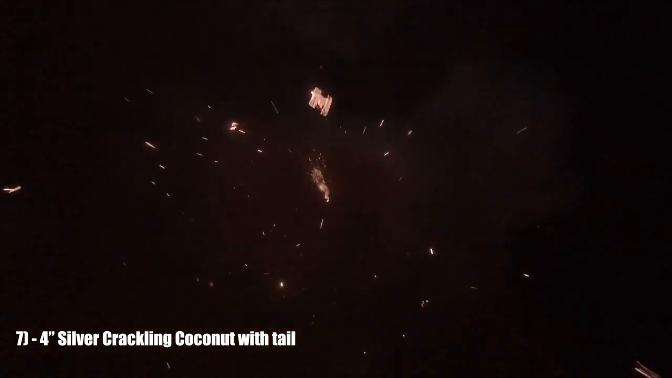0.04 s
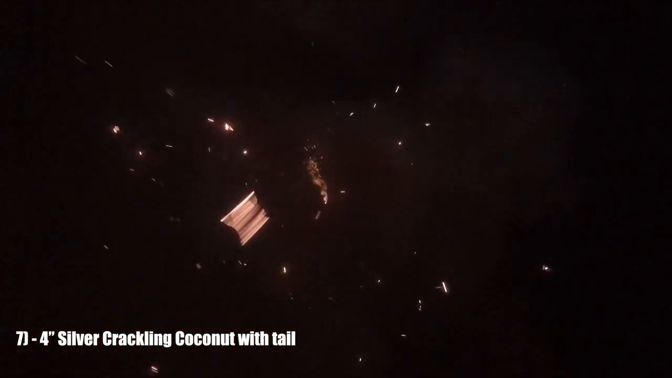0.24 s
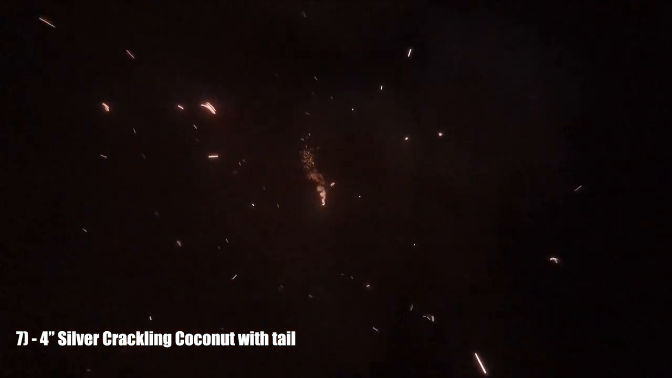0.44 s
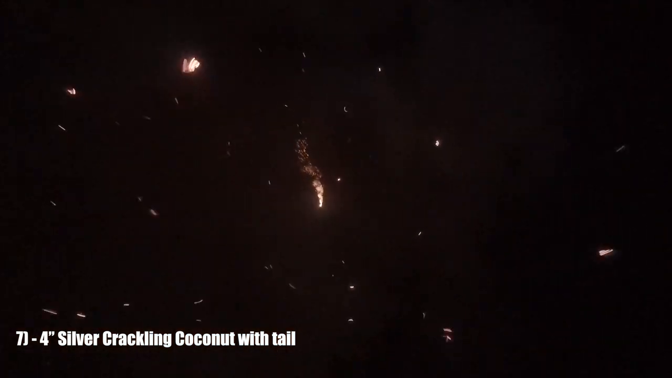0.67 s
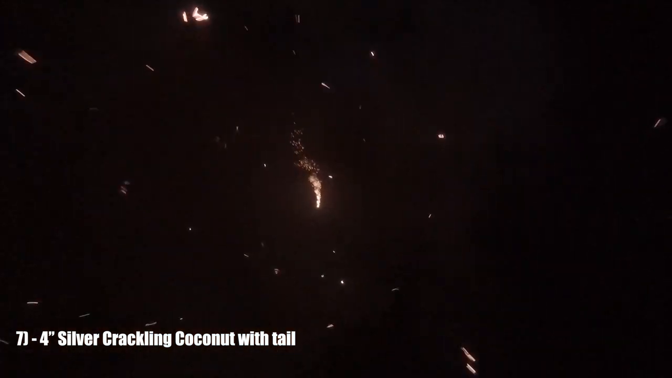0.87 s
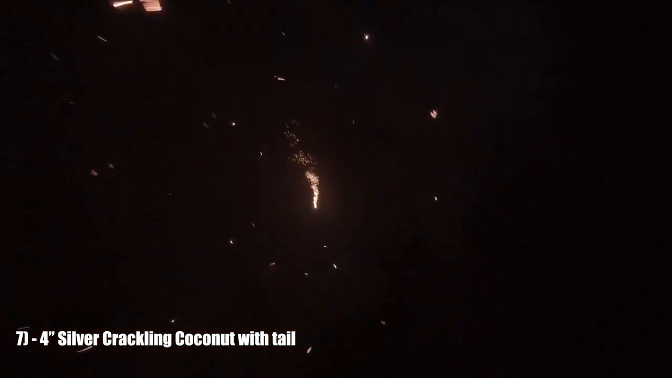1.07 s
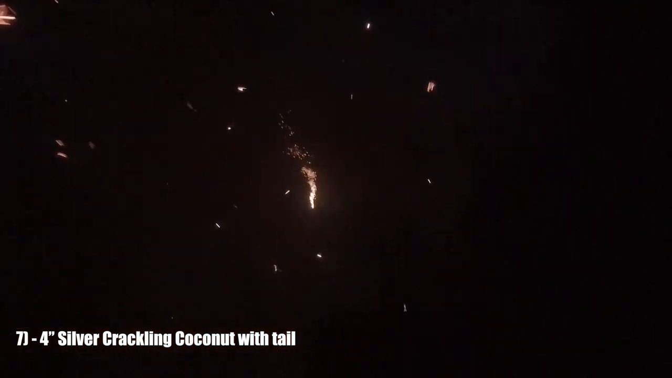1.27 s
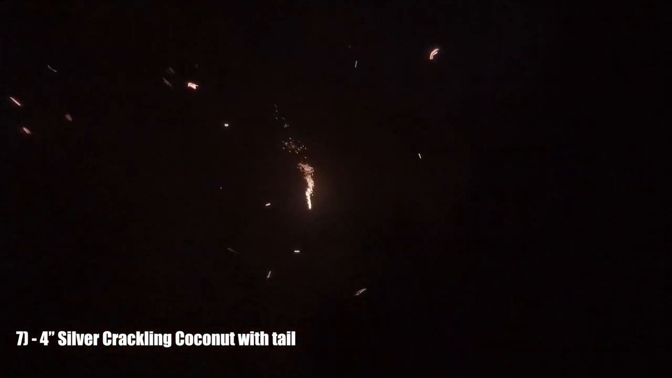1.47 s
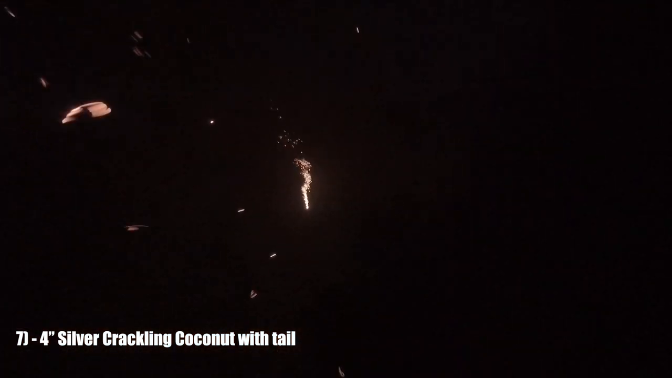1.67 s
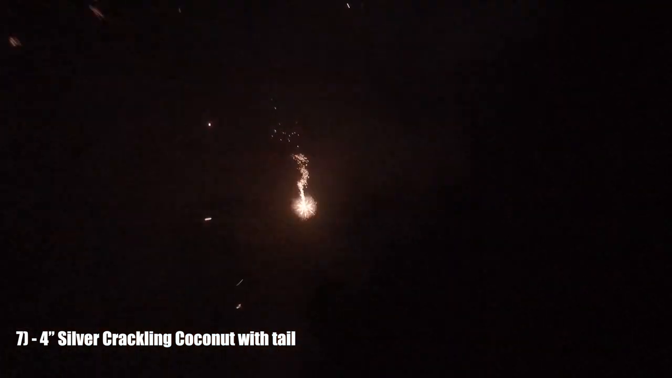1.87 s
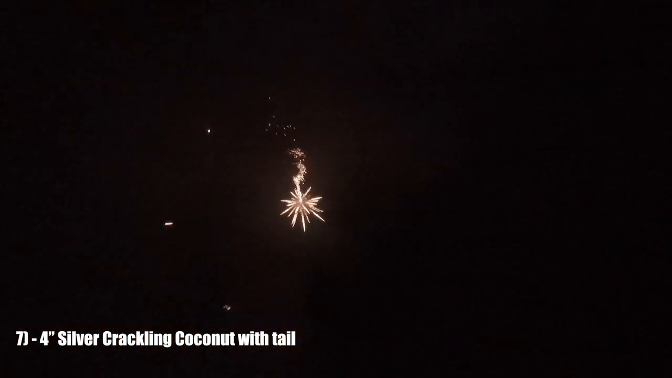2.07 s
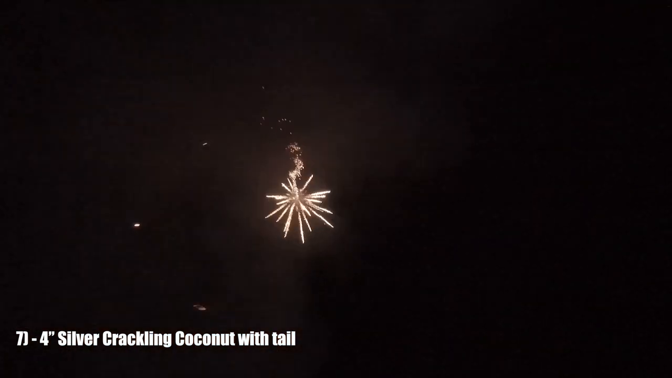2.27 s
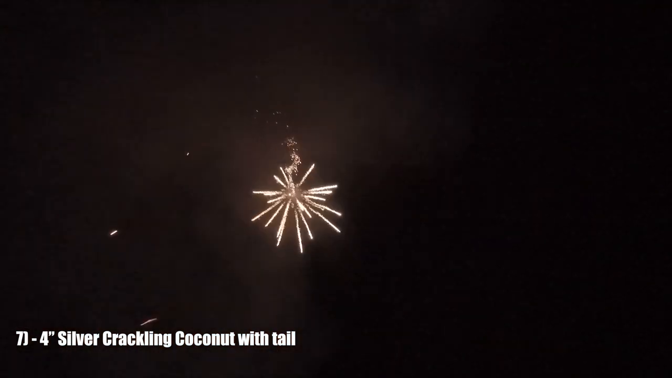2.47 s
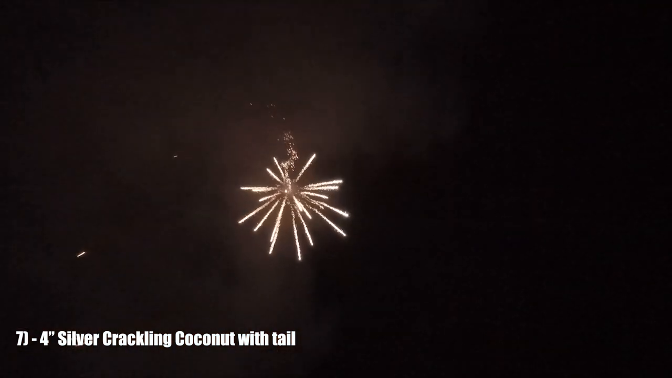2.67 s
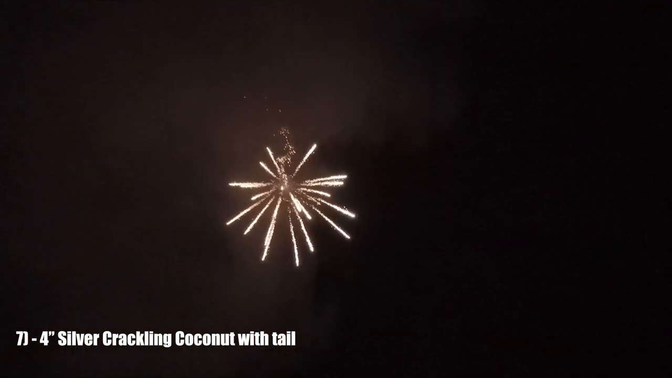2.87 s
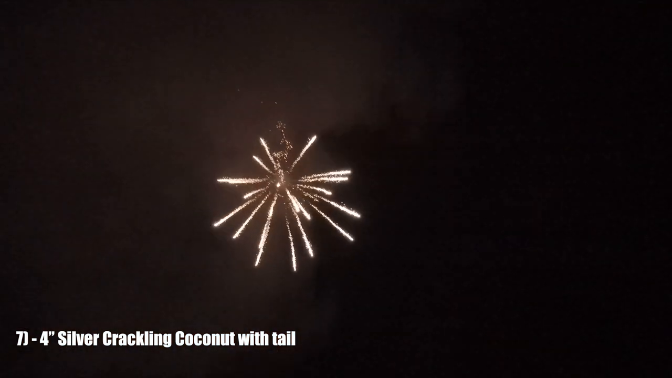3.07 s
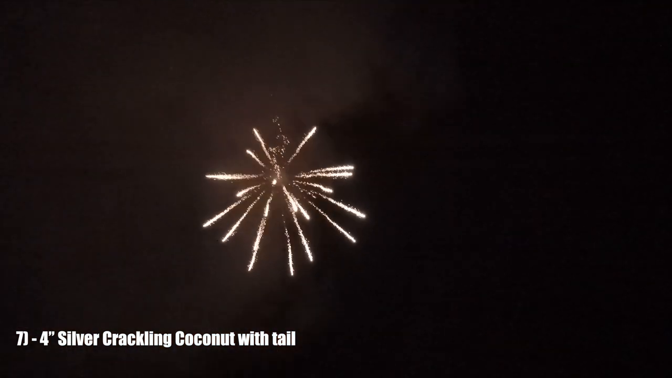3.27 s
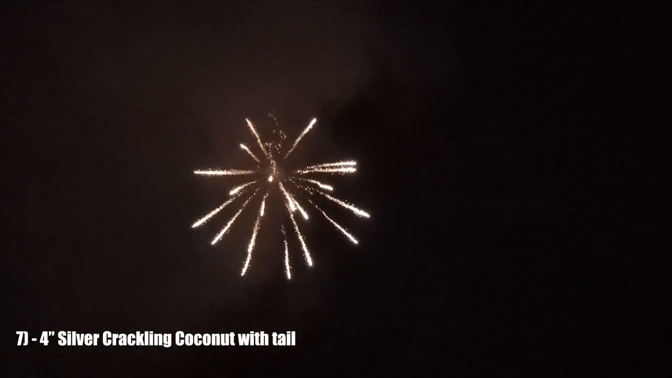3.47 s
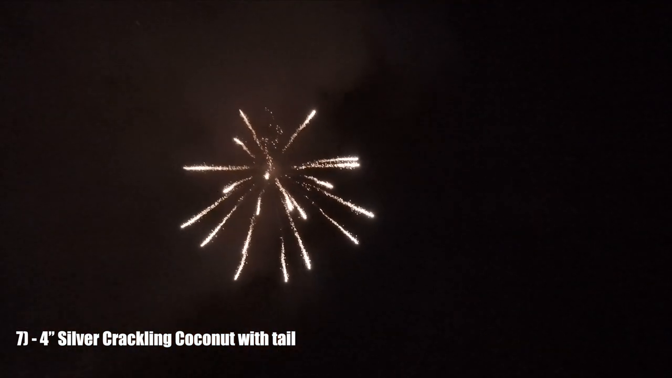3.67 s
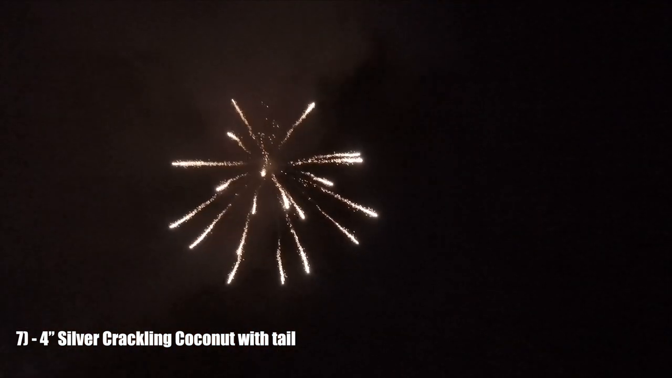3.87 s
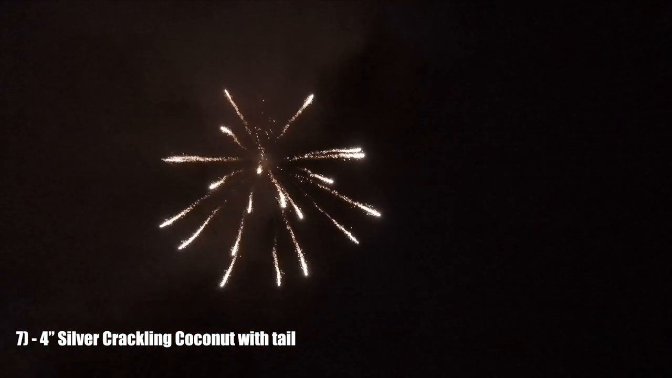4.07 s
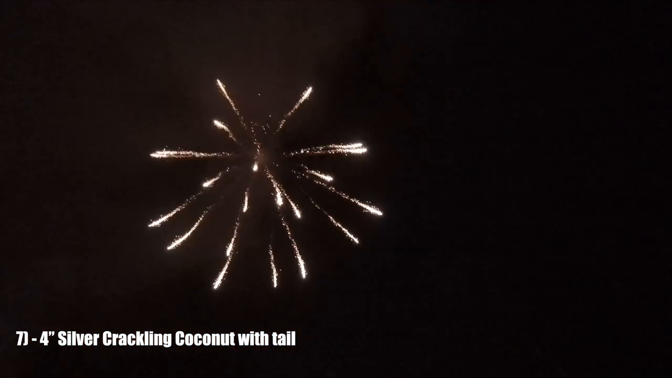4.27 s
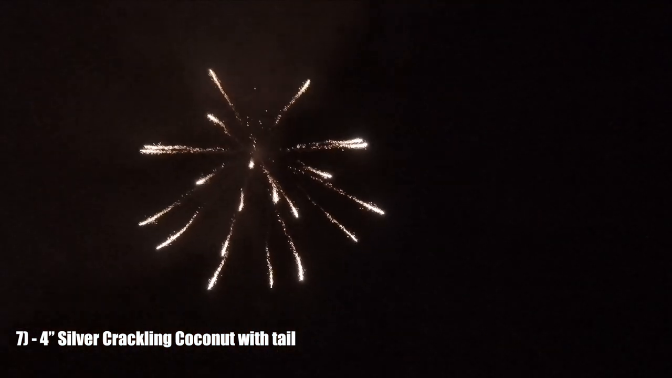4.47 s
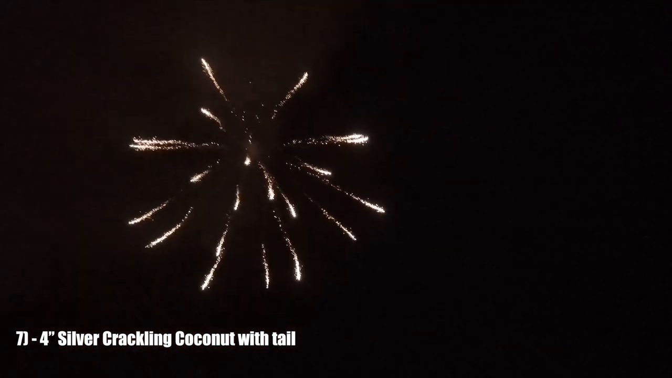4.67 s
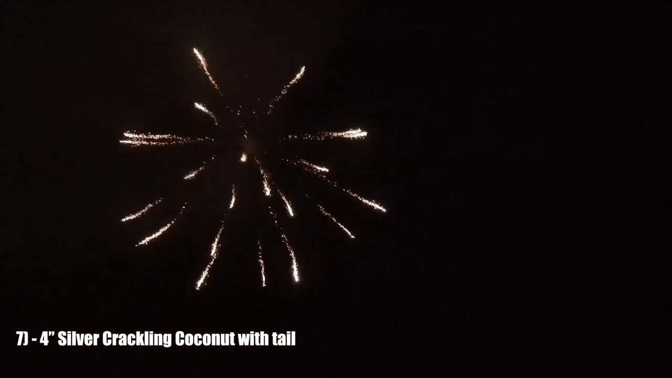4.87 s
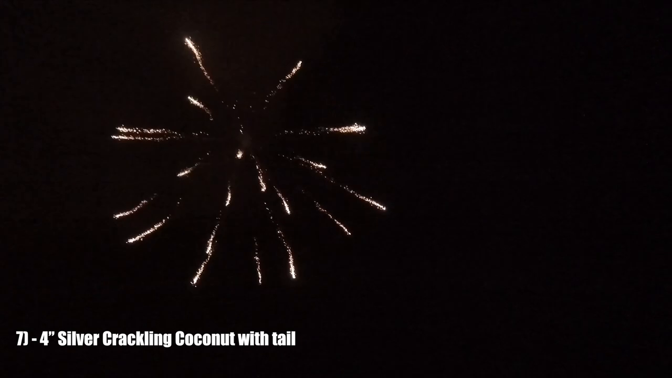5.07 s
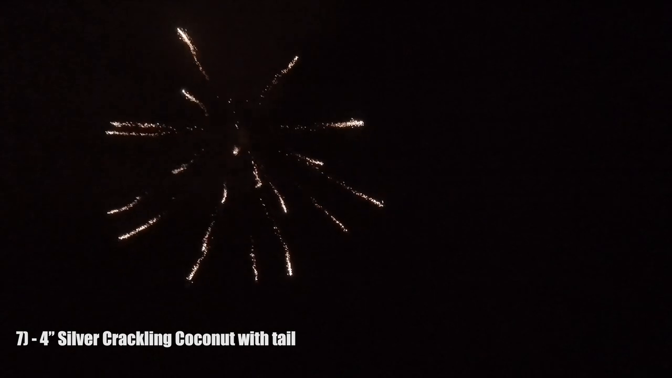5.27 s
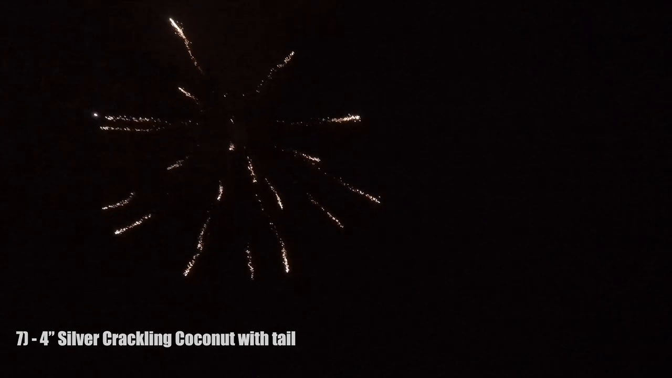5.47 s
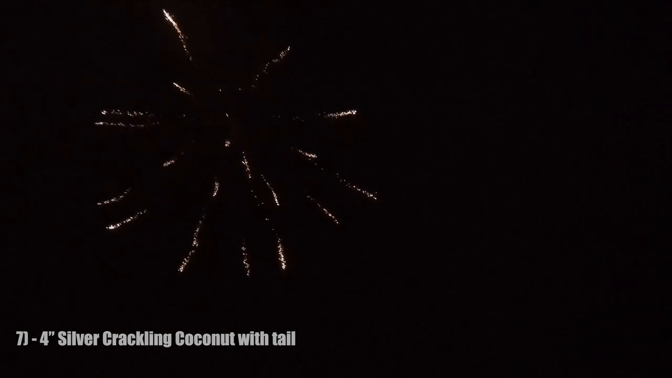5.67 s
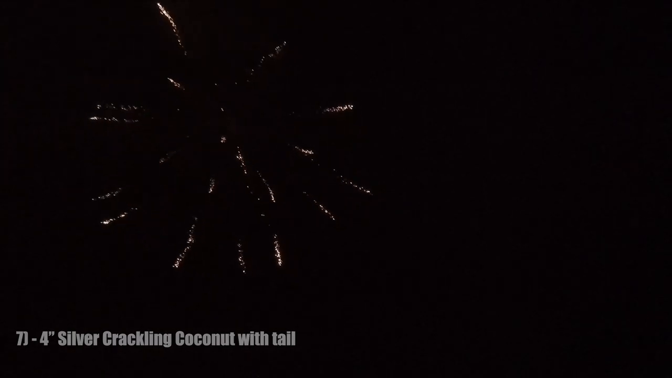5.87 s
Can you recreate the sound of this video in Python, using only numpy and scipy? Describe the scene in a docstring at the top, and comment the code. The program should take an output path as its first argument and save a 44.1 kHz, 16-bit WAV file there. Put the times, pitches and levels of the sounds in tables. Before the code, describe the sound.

A firework shell climbs with tiny sizzling ticks, bursts in a single huge bang, rumbles back, and crackles thickly before dying out.

```python
"""A firework shell bursts with one bang, which rolls back from the land near and far: shaped pulses and noise.
Its stars crackle as showers of short pulses, over a thousand a second at first, thinning and dulling.
Before the bang the climbing tail spits ringing ticks and sizzles, and a few tones swell into the burst.
Behind lie a low drone that surges twice and, as filtered noise, wind on the microphone, rumble and hiss.
The bang overloads the microphone, and the gain drops before it creeps back."""
import sys
import numpy as np
from scipy import signal
from scipy.fft import rfft, irfft, next_fast_len
from scipy.io import wavfile
from scipy.ndimage import uniform_filter1d, map_coordinates

SR = 44100
rng = np.random.default_rng(int(sys.argv[2]) if len(sys.argv) > 2 else 0)


def wrap_up_sound(samples):
    """Save the sound to the file named by the first command line argument, as 16-bit audio."""
    columns = np.atleast_2d(samples).T
    # keep every value between -1 and 1, then stretch to whole-number steps
    tamed = np.clip(columns, -1, 1)
    steps = np.round(tamed * 32767).astype(np.int16)
    wavfile.write(sys.argv[1], SR, steps)


N = 261072
TIME = np.arange(N) / SR
BURST_S = 2.2148  # the bang reaches the microphone


def amp(db):
    """Decibels to gain."""
    return 10 ** (np.asarray(db) / 20)


def unit(x):
    """x at rms 1."""
    return x / np.sqrt(np.mean(x ** 2) + 1e-20)


def peaked(x):
    """x at peak 1."""
    return x / (np.abs(x).max() + 1e-20)


def along(points, hz):
    """(Hz, value) points read on a log frequency axis."""
    f, v = np.transpose(points)
    return np.interp(np.log(hz + 1), np.log(f + 1), v)


def ramp(start, end):
    """A fade from 0 to 1 between two times in seconds."""
    return np.clip((TIME - start) / max(end - start, 1e-4), 0, 1)


def arch(db, full_s, rise_db_per_s, fall_s=0, fall_db_per_s=0):
    """A level in dB that climbs to its top, holds and may fall again."""
    climb_db = rise_db_per_s * np.maximum(full_s - TIME, 0)
    fall_db = fall_db_per_s * np.maximum(TIME - fall_s, 0)
    return db - climb_db - fall_db


def wobble(rate):
    """A smooth random curve, rate knots a second."""
    knots = rng.standard_normal(int(N * rate / SR) + 4)
    return map_coordinates(knots, [TIME * rate])


def filtered(x, response):
    """x times a response of frequency."""
    m = next_fast_len(N + SR // 2)
    return irfft(rfft(x, m) * response(np.fft.rfftfreq(m, 1 / SR)), m)[:N]


def noise(spectrum):
    """Coloured noise of rms 1."""
    return unit(filtered(rng.standard_normal(N), lambda hz: amp(along(spectrum, hz))))


def pulse(spectrum, size=4096):
    """The most abrupt pressure pulse that has this spectrum (minimum phase), energy 1."""
    gain = amp(along(spectrum, np.fft.rfftfreq(size, 1 / SR)))
    cepstrum = irfft(np.log(np.maximum(gain, 1e-6)))
    # folding the cepstrum forward packs the energy at the start
    cepstrum[1:size // 2] *= 2
    cepstrum[size // 2 + 1:] = 0
    shape = irfft(np.exp(rfft(cepstrum)))
    return shape / np.linalg.norm(shape)


def split(x, hz):
    """The parts of x below and above a frequency."""
    parts = []
    for kind in ("low", "high"):
        sos = signal.butter(3, min(hz, SR / 3), kind, fs=SR, output="sos")
        parts.append(signal.sosfilt(sos, x))
    return parts


def add(track, s, sound):
    """Mix a sound into a track at a time in seconds."""
    part = track[max(round(s * SR), 0):][:len(sound)]
    part += sound[:len(part)]


def shower(rate, spread_db, limit=1.3):
    """Impulses at random times and of uneven size, power about 1."""
    hit = rng.random(N) < rate / SR
    sizes = hit * amp(spread_db * np.minimum(rng.standard_normal(N), limit))
    power = np.abs(uniform_filter1d(sizes ** 2, size=8192))
    return sizes / np.sqrt(power + 1e-6)


def field(x):
    """Ground and trees scatter a sound into a short tail; the bass dies first, the middle lasts longest."""
    # Reverberation of the open ground: (frequency [Hz], time to fall by 60 dB [s])
    decay_times = [(200, 0.15), (1500, 1), (8000, 0.49)]
    hz, t, z = signal.stft(rng.standard_normal(SR // 2), SR, nperseg=256)
    fading = amp(-60 * t / along(decay_times, hz)[:, None])
    tail = signal.istft(z * fading, SR, nperseg=256)[1]
    return signal.fftconvolve(x, tail / np.linalg.norm(tail))[:N]


def blast(ground_s=0.00297):
    """The shock front jumps in one pulse; its bounce off the ground follows, duller, with a suction after it."""
    # Shock front: (frequency [Hz], relative level [dB])
    front_spectrum = [(100, -14), (400, 3), (750, 12), (1100, 1), (2000, -18.5), (4000, -53), (9000, -32.5),
                      (12500, -35), (16000, -52)]
    # Bounce off the ground: (frequency [Hz], relative level [dB])
    bounce_spectrum = [(30, -11), (120, -0.5), (250, -6.5), (450, -10), (800, -9.5), (1500, -38),
                       (3000, -49), (8000, -58), (15000, -82.5)]
    crack = peaked(split(pulse(front_spectrum), 13000)[0])
    push = peaked(pulse(bounce_spectrum))
    suction = -peaked(split(push, 400)[0])
    bang = np.zeros(N)
    add(bang, BURST_S, amp(2.5) * crack)
    add(bang, BURST_S + ground_s, amp(3.5) * push)
    add(bang, BURST_S + ground_s + 0.00071, amp(-12.5) * suction)
    return bang


def echoes():
    """The bang returns as decaying noise, ever deeper, with one faint slap and a bright wash off the trees."""
    # Early roll off the land nearby: (frequency [Hz], relative level [dB])
    near_roll = [(30, -40), (60, -17), (110, 1), (160, -1.5), (270, -1), (370, -29), (600, -24),
                 (1200, -52), (3000, -120)]
    # Later, deeper roll: (frequency [Hz], relative level [dB])
    far_roll = [(20, -23), (35, -3), (65, 3.5), (110, -2.5), (200, -3), (330, -12.5), (700, -18),
                (1200, -46), (3000, -120)]
    # Bright wash off the trees: (frequency [Hz], relative level [dB])
    wash_spectrum = [(180, -15), (350, 1.5), (700, -3.5), (1400, -2), (2800, -8), (4000, -14.5),
                     (6500, -19), (9500, -50), (11500, -51), (14000, -58), (16000, -85)]
    # Top of the wash, early and quick to die: (frequency [Hz], relative level [dB])
    glint_spectrum = [(2000, -25), (4000, 3), (7000, 0.5), (9500, -6), (11000, -20), (14000, -28),
                      (16000, -45)]
    wash_peak_s, glint_peak_s, slap_s = 2.408, 2.38, 2.277

    since = np.maximum(TIME - BURST_S, 0)
    nearby = amp(-13.5 - 24.5 * since)  # dB, then dB per second
    distant = amp(-26 - 11 * since)
    depth = ramp(2.28, 2.406)
    roll = np.sqrt(1 - depth) * noise(near_roll) + np.sqrt(depth) * noise(far_roll)
    roll *= np.hypot(nearby, distant)

    wash_db = arch(-24.5, wash_peak_s, 57, wash_peak_s, 31.5)
    glint_db = arch(-39, glint_peak_s, 23, glint_peak_s, 65)
    wash = amp(wash_db) * noise(wash_spectrum) + amp(glint_db) * noise(glint_spectrum)

    slap = np.zeros(N)
    knock = peaked(pulse([(100, -12), (300, -3), (520, 12), (750, -13), (1500, -23), (5000, -70)]))
    add(slap, slap_s, amp(-11.0) * knock)
    add(slap, slap_s + 0.0054, -amp(-19.0) * knock)  # the slap bounces off the ground too
    arrived = ramp(BURST_S + .007, BURST_S + .02)
    return (roll + wash) * arrived + slap


def dying(half_s, spread_s):
    """The share of the stars that still burn: half at half_s, falling along a smooth S."""
    return 1 / (1 + np.exp((TIME - half_s) / spread_s))


def crackle():
    """Each grain of the stars bursts as one short pulse; the pops thin out and dull as the stars burn out."""
    # Pops of the young stars: (frequency [Hz], relative level [dB])
    fresh_spectrum = [(120, -21), (300, -10), (520, -1), (720, 4.5), (950, 3), (1200, -2.5), (1700, -0.5),
                      (2500, -8), (3200, -14.5), (4500, -20.5), (6000, -20.5), (7500, -28), (10000, -44.5),
                      (14000, -74)]
    # Pops of the dying stars: (frequency [Hz], relative level [dB])
    spent_spectrum = [(60, -48), (150, -21), (350, -8.5), (600, 2.5), (950, 0), (1500, -8), (2400, -16.5),
                      (3300, -13), (5200, -12.5), (6200, -21.5), (7000, -32), (10000, -45), (16000, -68)]
    # Loudest pops, before the trims below: (time [s], reference level [dB], snap relative to it [dB])
    loud_pops = [(2.7041, -9.5, -7.5), (2.8559, -16.5, -19.0), (3.0979, -17, -7), (3.1503, -17.0, -6),
                 (3.2698, -15.5, -5.5), (3.3267, -18.5, -8), (3.5894, -25, 0), (3.6434, -21.5, 2.5),
                 (3.6719, -18.5, -2.5), (3.7895, -19, -8), (3.8093, -13.5, -21), (3.922, -17, -3.5),
                 (3.9406, -24, -3), (3.9995, -16, -17), (4.0348, -16, -18), (4.0809, -14, -16),
                 (4.1202, -14.5, -15), (4.2021, -16, -25.5), (4.386, -15.5, -19), (4.4108, -14.5, -12),
                 (4.5188, -18.5, -7), (4.7628, -21, -9.0), (4.8288, -18.0, -11.5), (4.8741, -20, -25),
                 (4.9444, -18, -13), (4.9592, -14, -18), (5.0498, -18.5, -8.5), (5.1137, -34, 2),
                 (5.1679, -15.5, -14), (5.192, -18.5, -12), (5.2423, -23.5, -13), (5.2571, -21, -16),
                 (5.2848, -31, -6.5), (5.2972, -19.5, -10), (5.323, -24, -14), (5.331, -24, -6),
                 (5.402, -24.5, -9), (5.4359, -25, -7.5), (5.463, -26, -4), (5.5244, -21, -8),
                 (5.5374, -22.5, -11), (5.5525, -25, -11), (5.5885, -23, -9), (5.6135, -35, -11),
                 (5.6335, -28, -14.0), (5.667, -22.5, -15), (5.7275, -31, -25), (5.7802, -27, -8),
                 (5.8651, -32, -1)]
    pops_per_s, stray_pops_per_s = 1150, 40  # with all stars alight; throughout the crackle
    body_db, young_snap_db, old_snap_db = -34, -42, -51  # bass part; treble of young and of dying stars
    dull_start_db, sharp_from_s = -2.5, 3.55  # the first pops lack treble

    alight = dying(4.986, 0.28)
    age = ramp(4.37, 4.77)
    grains = shower(pops_per_s * alight + stray_pops_per_s, spread_db=4.0, limit=1.74)
    grains = grains * ramp(2.4, 2.8)  # the stars ignite
    grains = grains * amp(0.72 * wobble(21.98))  # the pops come in clumps
    body = grains * amp(body_db) * np.sqrt(alight)

    snap_db = young_snap_db * (1 - age) + old_snap_db * age
    snap_db += dull_start_db * (1 - ramp(sharp_from_s - .05, sharp_from_s + 0.036))
    uneven_db = 2 * np.clip(rng.standard_normal(N), -2, 1.5)  # some pops are sharper than others
    # the snaps die out later than the body, and more suddenly
    snap = grains * amp(snap_db + uneven_db) * np.sqrt(dying(5.41, 0.071))

    young = split(pulse(fresh_spectrum), 2900)
    old = split(pulse(spent_spectrum), 2900)
    pops = np.zeros(N)
    for share, shapes in ((1 - age, young), (age, old)):
        for train, shape in zip((body, snap), shapes):
            pops -= signal.fftconvolve(share * train, shape / np.linalg.norm(shape))[:N]

    widths_s = rng.uniform(0.00037, 0.00092, len(loud_pops))
    for (s, db, sharp_db), width_s in zip(loud_pops, widths_s):
        thud, click = young if s < 4.6 else old
        thud, click = peaked(thud), peaked(click)
        pop = amp(db - 3) * thud + amp(db + sharp_db + 2.5) * click
        # a loud pop is an N-wave: push, suction, push
        add(pops, s - 0.65 * width_s, amp(db - 13) * thud)
        add(pops, s, -pop)
        add(pops, s + width_s, amp(db - 32) * thud)
        add(pops, s + rng.uniform(.0007, 0.00256), -amp(-7) * pop)  # its bounce off the ground
    return pops + amp(-9.0) * field(pops)


def tail_sparks():
    """The climbing tail spits sharp ticks, each with a pitch of its own, over a fine sizzle of pulses."""
    # Loudest sparks, before the trims below:
    # (time [s], peak level [dB], ring [Hz], top treble level [dB], body level [dB])
    loud_sparks = [(0.2788, -57, 4730, -19, 2), (0.351, -57, 5410, -24, -6), (1.2165, -29, 6050, -23, -3),
                   (1.424, -32.5, 3900, -17, 5), (1.5732, -31, 4560, -8, 4), (1.749, -37, 4980, -10, -17),
                   (1.8153, -25, 6000, -7.5, -2.5), (1.9006, -37, 5900, -23, -9),
                   (1.919, -35, 4800, -26, -32), (2.0934, -33, 6500, -13, -18), (2.1754, -37, 6330, -10, 5)]
    ticks, t = np.zeros(N), TIME[:600]
    for s, db, hz, top_db, body_db in loud_sparks:
        bass = [(300, body_db + 12.5), (1600, body_db)]
        ring = [(1.02 * hz, -7), (hz, 2)]
        treble = [(max(1.4 * hz, 10000), top_db - 2), (16000, top_db + 1.5)]
        tick = pulse(bass + ring + treble)
        spit = 0.15 * rng.standard_normal(len(t)) * np.exp(-t / 0.0017)
        spit[0] = 1
        add(ticks, s, amp(db + 2) * peaked(signal.fftconvolve(tick, spit)))

    burning = amp(-102 + 31.5 * ramp(0.16, 1.93)) * (TIME < BURST_S)
    for hz in (2830, 4070, 5600, 7500):
        fizz = pulse([(.2 * hz, -25), (0.56 * hz, -9), (hz, 0), (1.8 * hz, -12), (16000, -22)])
        ticks += signal.fftconvolve(shower(50, spread_db=7), fizz)[:N] * burning
    return ticks + amp(-32.0) * field(ticks)


def swell(rise_s=0.012, bend=1.43):
    """Low tones, thin fluttering high ones and grit swell for hundredths of a second, to break off at the bang."""
    # Tones before the bang, ahead of the common gain below: (frequency [Hz], level [dB])
    swell_tones = [(140.0, -12), (419.9, -22.5), (915, -33), (1357, -39), (1460, -34.5), (1739, -45),
                   (2110, -38), (2293, -38), (2767, -34), (3612, -63), (3989, -54), (5012, -63),
                   (5394, -56), (6325, -38), (7456, -43), (8484, -69), (9981, -54)]
    near = np.abs(TIME - BURST_S) < .06
    t = TIME[near] - BURST_S
    tones = np.zeros(N)
    for hz, db in swell_tones:
        flutter_db = 6.3 * (hz > 1000) * np.sin(2 * np.pi * (90 * t + rng.random()))
        tones[near] -= amp(db + flutter_db) * np.sin(2 * np.pi * hz * t)
    grit = amp(-22.0) * noise([(300, -7), (850, 10.5), (1200, -10), (2800, -4), (4000, -20.0),
                               (7000, -15), (12000, -38), (15000, -48), (16000, -68)])
    lead = np.maximum(BURST_S - .006 - TIME, 0)
    rise = np.exp(-(lead / rise_s) ** bend)
    cut = 1 - ramp(BURST_S - .001, BURST_S + 0.0043)
    return (amp(8.5) * tones + grit) * rise * cut


def drone():
    """Low noise in a narrow band, uneven in level, sets in under the crackle and surges twice."""
    # Colour of the drone: (frequency [Hz], relative level [dB])
    drone_spectrum = [(50, -70), (105, -34), (138, -4), (172, 0), (220, -3), (310, -9.5), (500, -37),
                      (900, -53), (2000, -120)]
    # Surges of the drone: (time [s], added level [dB])
    surges = [(3.6, 3), (5.8, 6)]
    surge_width_s = 0.078
    surge_db = sum(db * np.exp(-.5 * ((TIME - s) / surge_width_s) ** 2) for s, db in surges)
    level = amp(-40.5 + surge_db + 0.65 * wobble(12))
    return level * noise(drone_spectrum) * ramp(3.04, 3.52)


def air():
    """Noise for wind on the microphone, a far rumble and a thin hiss fades in over a steady rush; wind drops."""
    # Wind on the microphone: (frequency [Hz], relative level [dB])
    wind_spectrum = [(8, -22), (20, 12), (32, 11), (55, 3.5), (80, -2.5), (130, 0.5), (250, -32),
                     (600, -120)]
    # Far rumble: (frequency [Hz], relative level [dB])
    rumble_spectrum = [(110, -7), (170, -4.5), (270, 3), (400, -1.5), (550, -4), (750, -6.5), (1100, -18),
                       (1600, -26), (2300, -30), (3000, -36.5), (5000, -55), (9000, -120)]
    # Faint steady rush: (frequency [Hz], relative level [dB])
    rush_spectrum = [(300, -29), (900, -1), (1400, -1.5), (2200, -11.5), (2800, -24), (3600, -30),
                     (6000, -120)]
    # Thin hiss: (frequency [Hz], relative level [dB])
    hiss_spectrum = [(1500, -4), (5500, 1), (7000, 5.5), (9500, 1.5), (12000, -4), (15000, -5),
                     (16000, -41)]
    # Climb of the wind: (level [dB], reached at [s], climb [dB/s])
    wind_rise = (-43.5, 1.35, 14.4)
    # Climb of the rumble, before 1.5 dB is added: (level [dB], reached at [s], climb [dB/s])
    rumble_rise = (-45.5, 1.896, 6.24)
    # Climb of the hiss, before 8 dB is added: (level [dB], reached at [s], climb [dB/s])
    hiss_rise = (-73.5, 1.86, 13.8)

    wind_db = arch(*wind_rise, fall_s=3.88, fall_db_per_s=12) + 2.2 * wobble(16.0)
    wind = amp(wind_db) * noise(wind_spectrum)

    deep = ramp(.3, 1.18) * (1 - ramp(3.93, 4.76))  # the rumble has its bass only while the wind is up
    full = split(noise(rumble_spectrum), 114)[1]
    thin = split(noise(rumble_spectrum), 200)[1]
    rumble = np.sqrt(deep) * full + np.sqrt(1 - deep) * thin
    rumble *= amp(arch(*rumble_rise) + 1.5 + 0.14 * wobble(22))

    rush = amp(-66.0) * noise(rush_spectrum)
    hiss = amp(arch(*hiss_rise) + 8.0) * noise(hiss_spectrum)
    return wind + rumble + rush + hiss


def scene():
    """Burst, echo, crackle, climb and night air at one microphone."""
    burst = blast() + echoes() + crackle()
    climb = tail_sparks() + swell()
    return (burst + climb + drone() + air())[None]


def gain_control(x):
    """The recorder's gain control: an overload turns the gain down; it stays down, then creeps back."""
    overload, react_s = 1.0, .012  # peak that triggers it; delay
    duck_db, hold_s, recover_db_per_s = 12, 0.59, 14.5
    last_overload = np.maximum.accumulate(np.where(np.abs(x) > overload, TIME, -np.inf))
    since = TIME - last_overload
    cut_db = np.maximum(duck_db - recover_db_per_s * np.maximum(since - hold_s, 0), 0)
    cut_db = uniform_filter1d(cut_db, size=256)
    return x * amp(-np.interp(TIME - react_s, TIME, cut_db))


def record(dry):
    """The bang ducks the gain and rounds off at the microphone's limit; nothing passes above the band limit."""
    top_hz = 16500
    ridden = gain_control(dry[0])
    clipped = ridden / (1 + np.abs(ridden) ** 8) ** (1 / 8)
    return filtered(clipped, lambda hz: hz < top_hz)[None]


dry = scene()
out = record(dry)
wrap_up_sound(out)
```